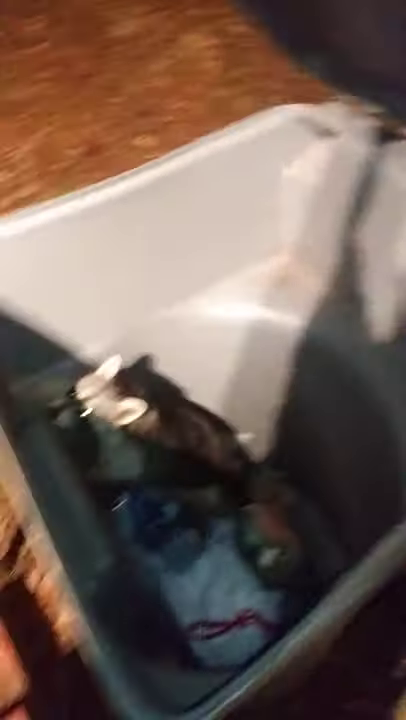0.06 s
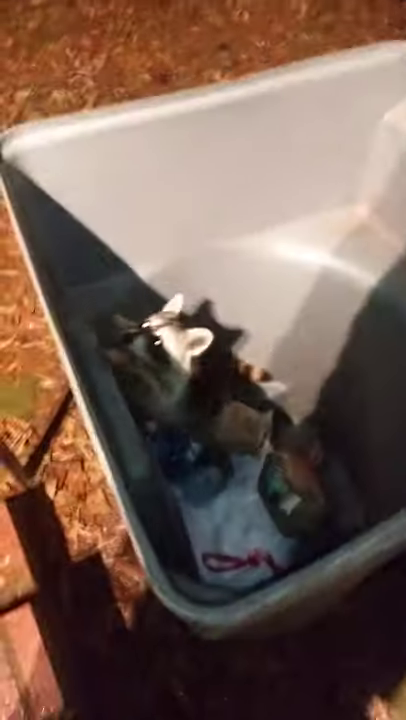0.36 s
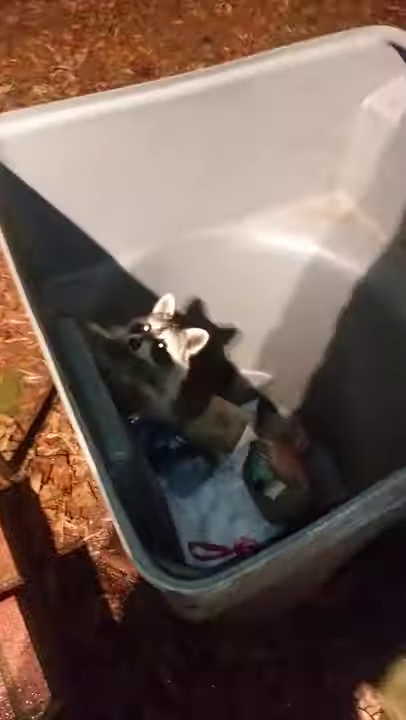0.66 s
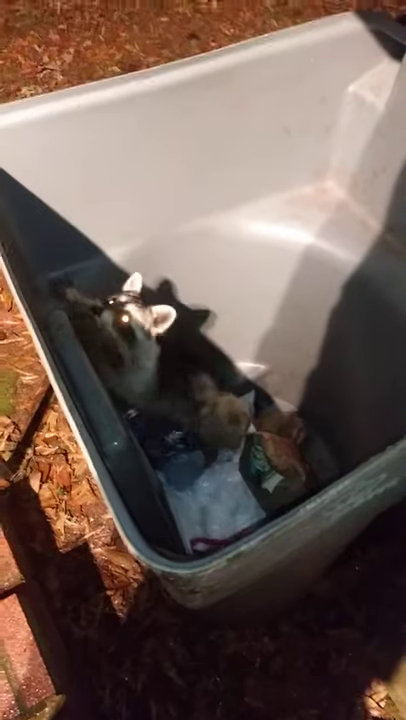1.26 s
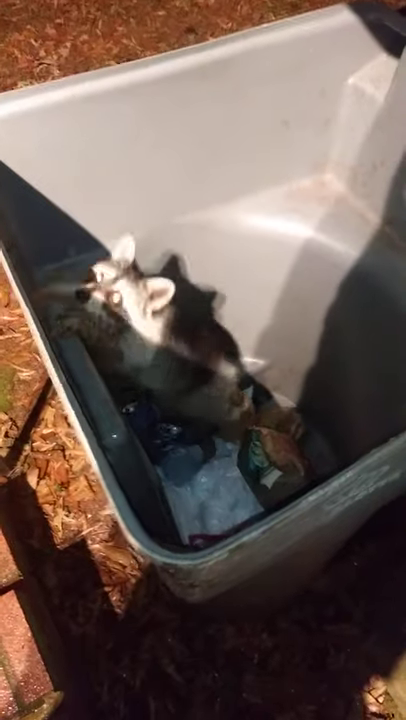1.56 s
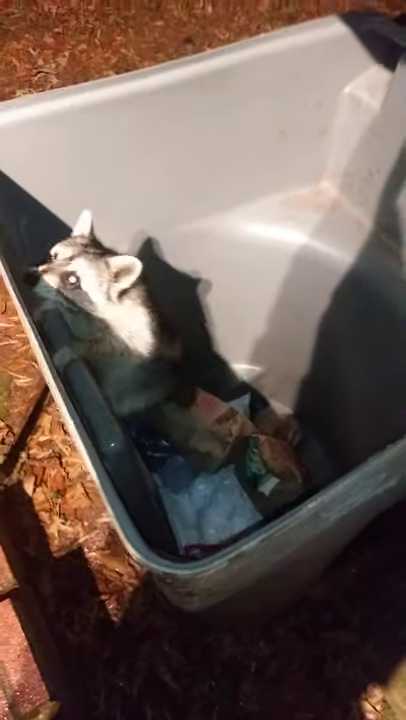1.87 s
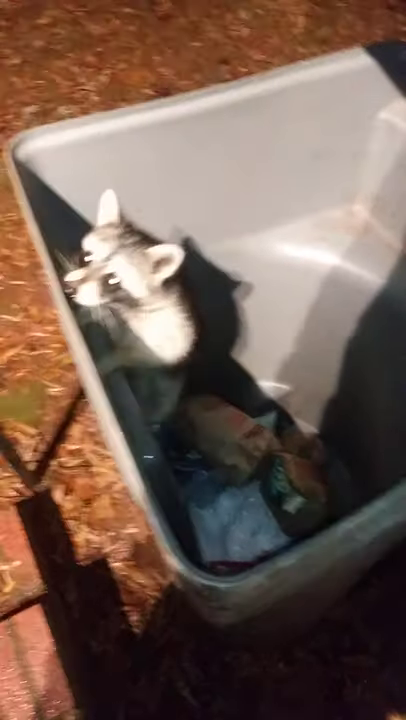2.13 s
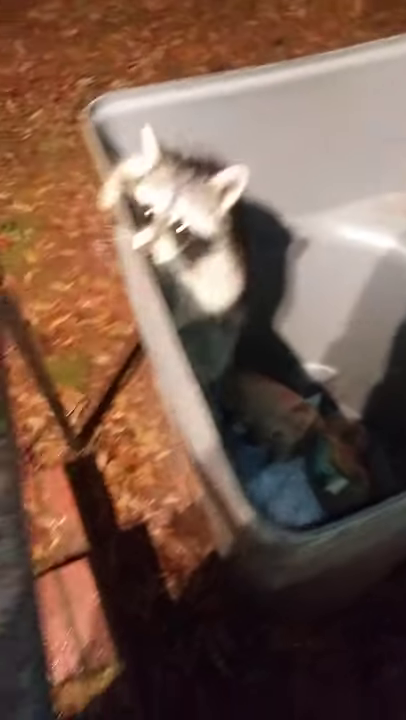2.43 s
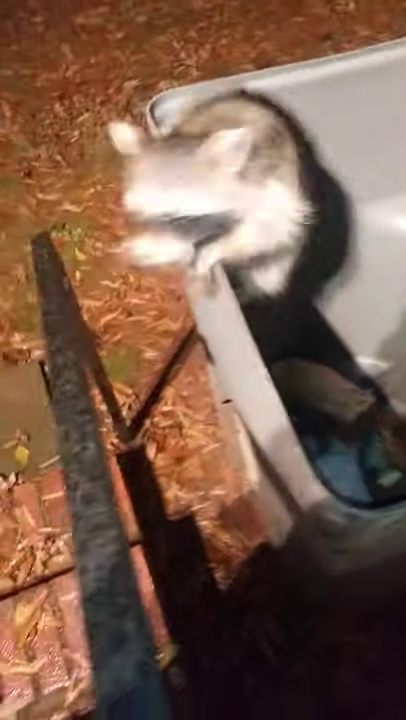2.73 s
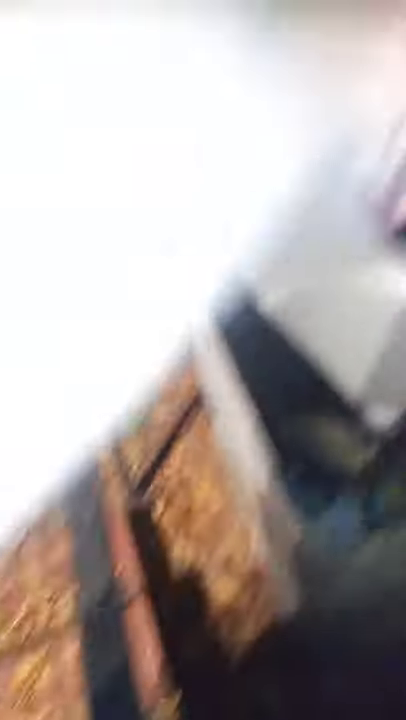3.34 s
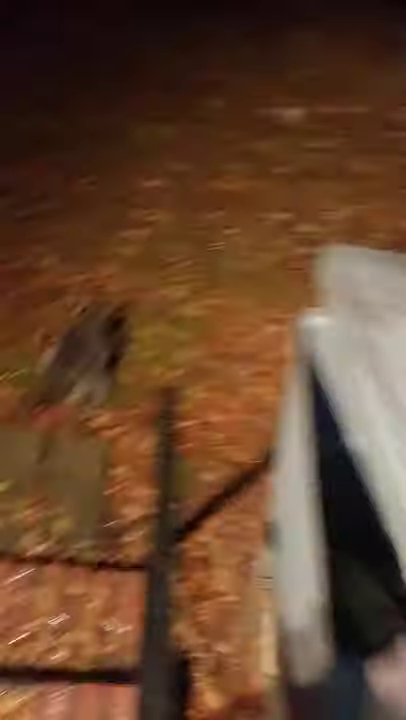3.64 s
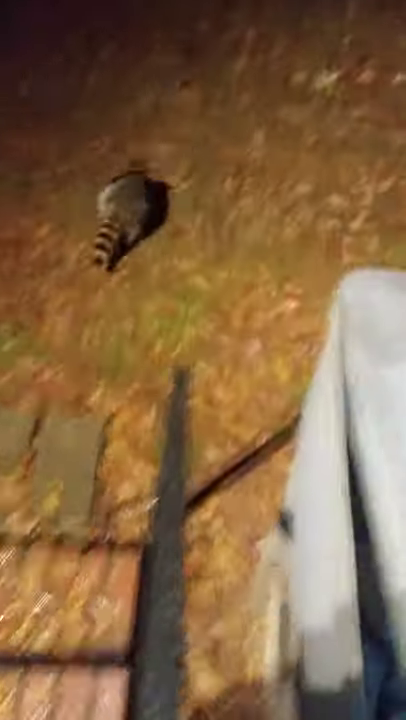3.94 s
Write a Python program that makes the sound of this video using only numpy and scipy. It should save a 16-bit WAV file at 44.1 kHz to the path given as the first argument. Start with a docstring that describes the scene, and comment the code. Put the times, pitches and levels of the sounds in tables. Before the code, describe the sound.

Scrabbling, rustling and hollow knocks as a raccoon claws its way out of a plastic bin.

```python
"""In a yard at night, a raccoon scrabbles inside a plastic wheelie bin. Litter crinkles under it in
thousands of tiny snaps, its paws thump the hollow walls and make them ring, its claws catch and
scratch, and its pads stick and squeak. It pauses, hauls itself over the rim with a knock and drops
into dry leaves; a quick clatter of hard plastic taps and more knocks follow. The yard gives a faint
echo, and a quiet outdoor hiss with a thin, high whine lies under it all."""
import sys
import numpy as np
from scipy import signal
from scipy.fft import rfft, irfft, next_fast_len
from scipy.io import wavfile
from scipy.ndimage import map_coordinates

SR = 44100
rng = np.random.default_rng(int(sys.argv[2]) if len(sys.argv) > 2 else 0)


def unload_audio(sound):
    """Save the sound as a 16-bit wav file, at the path given as the first command line argument."""
    columns = np.transpose(np.atleast_2d(sound))
    # keep every value between -1 and 1, then stretch to whole-number steps
    steps = np.round(np.clip(columns, -1, 1) * 32767)
    wavfile.write(sys.argv[1], SR, steps.astype(np.int16))


N = 176400  # 4 seconds

# Trampled litter and the walls it rubs: (time [s], crinkle level [dB], wall level [dB])
LITTER_LEVELS = [(0, -27.5, -38.5), (.09, -34.5, -35.5), (.15, -44.5, -42.5), (.19, -28, -30),
                 (.225, -31.5, -39.5), (.28, -28, -39), (.31, -34, -38), (.35, -29, -41), (.39, -40, -41.5),
                 (.47, -41, -45), (.545, -41, -41), (.6, -41.5, -51), (.64, -48, -46.5), (.7, -41, -48.5),
                 (.745, -42, -42.5), (.77, -44, -39), (.825, -33, -36), (.85, -40, -34), (.9, -31, -46),
                 (.955, -29.5, -35), (.975, -38, -39), (1, -29, -47), (1.03, -32.5, -41.5),
                 (1.06, -45, -42), (1.15, -40, -49), (1.19, -39.5, -37.5), (1.215, -39, -38.5),
                 (1.3, -45, -46), (1.355, -33, -37.5), (1.39, -35, -35.5), (1.44, -46, -48.5),
                 (1.5, -42, -45), (1.555, -40.5, -38), (1.58, -32.5, -34), (1.61, -40.5, -40),
                 (1.645, -26, -37), (1.685, -36, -55), (1.705, -30.5, -40), (1.76, -39, -40),
                 (1.79, -38.5, -42), (1.85, -41.5, -44), (1.9, -49, -48), (1.96, -53.5, -64),
                 (2.1, -86.5, -98)]
# Tone of the litter: (frequency [Hz], level [dB])
LITTER_TONE = [(100, -84), (300, -3.5), (600, -6.5), (1100, 0.5), (1500, -2.5), (2300, 0.5), (3700, 1.5),
               (4500, 0), (5600, -12), (6600, -16), (8000, -22.5), (9800, -15), (13000, -16), (16000, -20)]
# Tone laid over the ring of the rubbed walls: (frequency [Hz], level [dB])
WALL_TONE = [(60, -29), (130, -1.5), (300, 1.5), (650, 3), (1100, 17), (2000, 3), (6000, -28)]
# Single sharp snaps of litter: (time [s], level [dB])
LITTER_SNAPS = [(0.221, -33.5), (.2428, -37), (0.3289, -35.5), (0.356, -35.5), (0.9932, -39.5),
                (1.6962, -36.5)]
# Notes the bin rings at: (frequency [Hz], level [dB], fade time [s])
# A fade time, or t60, is how long a sound takes to drop by 60 dB.
BIN_NOTES = [(117.5, -25, 0.61), (176, -12, 0.36), (216, -2, 0.17), (252.8, 0.5, 0.19), (277.3, -3, 0.19),
             (313.9, 0.5, 0.14), (337.3, -10, 0.16), (398.5, -5, 0.2), (421, -3, 0.15), (460, -4.5, 0.16),
             (536, -3, 0.094), (588, 0, 0.078), (617, -1, 0.13), (663, -5, 0.094)]
# Blows on the bin: (time [s], ring level [dB], pitch the struck spot favours [Hz], its boost [dB],
# clack level [dB], top of the clack [Hz], ring length [factor])
BIN_BLOWS = [(0.1584, -17.5, 385, 9, -23, 1050, 0.85), (0.825, -31, 495, -3, -35, 2400, 0.61),
             (0.852, -31, 595, 7, -34.5, 2000, 0.45), (0.886, -31, 240, 0, -38, 1500, 0.82),
             (1.0694, -26, 390, -0.5, -29, 1000, 0.87), (1.4, -29.5, 660, 8.5, -30.5, 1100, 0.3),
             (1.579, -23, 233, 4.5, -37, 890, 1.06), (1.656, -26.5, 600, 6, -52, 1500, 0.75),
             (1.745, -32.5, 252, 9.5, -60, 1000, 1.3), (2.917, -55, 324, 32, -26.5, 1800, .6),
             (2.922, -26, 302, 19.5, -42, 1600, 0.79), (3.057, -37.5, 306, 8.5, -47.5, 900, 0.53),
             (3.444, -34, 340, 7, -43.5, 1270, 0.87), (3.556, -40, 300, 11, -51, 1600, 0.54),
             (3.6, -41, 380, 8, -47, 1600, 0.32), (3.858, -30, 620, 33, -31, 2180, 0.64),
             (3.863, -23, 381, 21.5, -36, 1210, 0.96), (3.943, -36, 500, 12, -49.5, 1210, 0.84),
             (3.981, -36, 454, 10, -45, 1200, 1.5)]
# Tone of a blow's clack: (frequency [Hz], level [dB])
CLACK_TONE = [(50, -36), (150, -42), (400, -1.5), (750, 3.5), (1100, 2), (1600, 0.5), (4000, -4)]
# Claw strokes: (time [s], level [dB], centre [Hz], treble level [dB], rise time [s], fade time [s])
CLAW_STROKES = [(0.113, -35.5, 4200, -39.5, 0.002, 0.089), (0.412, -38, 3600, -51, 0.001, 0.041),
                (.442, -36, 3750, -50, 0.0011, 0.027), (0.514, -43, 4500, -39, 0.0003, 0.055),
                (.532, -36.5, 1430, -56, 0.012, 0.082), (0.726, -40, 3540, -49.5, 0.0018, 0.032),
                (.76, -31, 1770, -66, 0.011, 0.21), (.824, -29.5, 2140, -64, .007, 0.05),
                (0.851, -32.5, 2210, -41.5, 0.00051, 0.053), (1.231, -30, 4170, -41, 0.0027, 0.027),
                (1.399, -27.5, 3240, -48.5, 0.002, 0.035), (1.573, -35, 3820, -41.5, 0.0026, 0.041),
                (1.62, -34, 4030, -40.5, 0.0018, 0.068), (1.659, -33.5, 3800, -45, 0.0009, 0.03),
                (1.809, -32.5, 4300, -40, 0.0026, 0.078), (1.873, -35.5, 4180, -44.5, 0.0014, 0.035),
                (1.91, -41.5, 3640, -44.5, 0.00067, 0.058), (2.25, -44, 3060, -56.5, 0.00067, 0.045),
                (2.487, -52.5, 2250, -71, 0.0005, 0.12), (2.781, -42.5, 3920, -54.5, 0.0023, 0.09),
                (2.846, -43.5, 2780, -54.5, 0.0015, 0.074), (2.914, -36, 1700, -60, 0.0011, 0.14),
                (2.945, -45, 4400, -60, 0.014, 0.22), (3.643, -43.5, 2500, -52, 0.0006, 0.074),
                (3.749, -60, 3980, -51, 0.003, 0.06), (3.857, -35.5, 2800, -53.5, 0.00041, 0.074)]
# Tone of the body of a scratch: (frequency [Hz], level [dB])
CLAW_TONE = [(100, -59), (400, -4), (1000, 4.5), (2200, 3), (3700, 4), (4700, 1), (5700, -8), (6700, -14),
             (8200, -40)]
# Tone of its bright edge: (frequency [Hz], level [dB])
CLAW_TREBLE_TONE = [(4000, -10), (8000, -5.5), (9800, 2), (12500, 2), (16000, -0.5)]
# Small ringing notes of the plastic under a claw: (frequency [Hz])
PLASTIC_NOTES = [1710, 2560, 3500, 4300]
# A quick clatter of hard plastic taps: (time [s], level [dB])
CLATTER_TAPS = [(3.549, -34.5), (3.5538, -35), (3.56, -37), (3.57, -36.5), (3.58, -39.5), (3.586, -52),
                (3.602, -32.5), (3.607, -54)]
# Notes of the clattering plastic: (frequency [Hz], width [Hz], level [dB])
CLATTER_NOTES = [(1350, 400, -6), (2500, 330, -5), (3330, 240, 1), (3820, 320, 0.5), (4620, 380, 0),
                 (9560, 600, -11.5), (10530, 490, -10.5), (13500, 2500, -20)]
# Paw pads squeaking on the plastic: (time of the peak [s], level [dB], pitch [Hz])
PAD_SQUEAKS = [(.54, -39, 1075), (1.755, -40.5, 756), (2.668, -44, 614)]
# Paws and fur sliding over the rim, then the run through leaves: (time [s], level [dB])
SLIDE_LEVELS = [(2.2, -60), (2.37, -59), (2.4, -55.5), (2.46, -59.5), (2.5, -51), (2.6, -55.5),
                (2.665, -41.5), (2.725, -48), (2.75, -60.5), (2.87, -47.5), (2.95, -57), (3.01, -58),
                (3.04, -50.5), (3.1, -53.5), (3.13, -47), (3.19, -40.5), (3.23, -51.5), (3.35, -55.5),
                (3.42, -54.5), (3.52, -54), (3.58, -56), (3.72, -55.5), (3.82, -58.5), (3.9, -47.5),
                (4, -49)]
# Tone of that sliding: (frequency [Hz], level [dB])
SLIDE_TONE = [(80, -41), (180, 2), (320, 9), (600, 3), (1100, 4.5), (2100, 0.5), (3500, -2.5), (4700, -5.5),
              (5800, -15.5), (8000, -20), (10000, -15)]
# A soft brushing as the animal leaves the rim: (time [s], level [dB])
BRUSH_LEVELS = [(3.1, -77), (3.22, -57.5), (3.36, -59), (3.5, -54.5), (3.6, -99)]
# Tone of the outdoor hiss: (frequency [Hz], level [dB])
AIR_TONE = [(60, -19), (120, -7), (250, 4.5), (600, 1), (1300, 2.5), (2200, -4), (4300, -5.5), (5800, -12),
            (8000, -22), (10000, -11.5), (14000, -17)]

CRINKLES_PER_S, CRINKLE_SPREAD_DB, CLUMP_DB = 6000, 2.5, 1
FIZZ_HZ, FIZZ_FLICKER_DB, FIZZ_LINGER, FIZZ_PIVOT_DB = 5800, -1.5, 0.085, -33
HOLLOW_T60_S, HOLLOW_DB = 0.025, -3.5
SPOT_OCTAVES, NOTE_SCATTER_DB, PHASE_SCATTER_CYCLES = 0.42, 2, 0.4
SHARP_FRACTION, PITCH_SINK_S = 0.063, 0.015
PAD_RISE_S, HARD_RISE_S = 0.0042, 0.00041
BASS_CUT_HZ = 203  # takes the deep bass out of the thumps and taps
CLAW_GRAINS_PER_S, CLAW_SPREAD_DB, CLAW_RING_DB, PLASTIC_DB = 8000, 1.5, 7, 3.5
CLATTER_TAIL_DB, SQUEAK_SWELL_S = -22.5, 0.014
YARD_T60_S, YARD_DB = 0.3, -14.5
AIR_DB, WHINE_HZ, WHINE_DB, TOP_HZ = -62.5, 14002, -82, 16000


def litter():
    """Paper and plastic crinkle underfoot and rub the walls into a hollow murmur."""
    level_db, walls_db = curves(LITTER_LEVELS)
    rustle = with_tone(crinkle(), LITTER_TONE)
    # The high fizz flickers, and drops less than the rest between strokes.
    fizz = filtered(rustle, lambda f: f > FIZZ_HZ)
    fizz_db = FIZZ_FLICKER_DB * wobble(per_s=24.7) + FIZZ_LINGER * (FIZZ_PIVOT_DB - level_db)
    rustle = rustle + fizz * (amp(fizz_db) - 1)
    # The longer a note rings, the narrower its peak.
    notes = [(hz, 2 * np.log(1000) / (np.pi * t60), db) for hz, db, t60 in BIN_NOTES]
    walls = with_tone(filtered(crinkle(), lambda f: ringing(f, notes)), WALL_TONE)
    return amp(level_db) * rustle + amp(walls_db) * walls


def crinkle(chunk=512):
    """Clumps of tiny snaps, each chunk smeared differently by the hollow of the bin."""
    clicks = grains(N, CRINKLES_PER_S, CRINKLE_SPREAD_DB) * amp(CLUMP_DB * wobble(per_s=70))
    track = clicks.copy()
    for i in range(0, N, chunk):
        tail = echo_tail(4 * chunk, HOLLOW_T60_S)
        add(track, i / SR, amp(HOLLOW_DB) * signal.fftconvolve(clicks[i:i + chunk], tail))
    return track


def snaps():
    """A crease in the litter gives way with one short crack."""
    track, t = np.zeros(N), np.arange(SR // 10) / SR
    for start, db in LITTER_SNAPS:
        crack = rng.standard_normal(len(t)) * fade(t, t60=0.031)
        crack = np.pad(crack, (len(t), 0))  # room for the filter to spread the crack
        add(track, start - len(t) / SR, amp(db) * burst(with_tone(crack, LITTER_TONE)))
    return track


def thumps():
    """Each blow clacks and rings the bin's low notes; the spot struck changes their balance."""
    track, t = np.zeros(N), np.arange(SR // 3) / SR
    hz, db, t60 = np.transpose(BIN_NOTES)[:, :, None]
    bass_cut = signal.butter(2, BASS_CUT_HZ, "high", fs=SR, output="sos")
    # A dented wall starts a little sharp and sinks to its own pitch.
    cycles = hz * (t + SHARP_FRACTION * PITCH_SINK_S * rise(t, PITCH_SINK_S))
    for start, ring_db, spot_hz, spot_db, clack_db, top_hz, length in BIN_BLOWS:
        note_db = db + spot_db * bell(hz, spot_hz, SPOT_OCTAVES)
        note_db += NOTE_SCATTER_DB * rng.standard_normal(hz.shape)
        phase = 2 * np.pi * (cycles + PHASE_SCATTER_CYCLES * rng.random(hz.shape))
        notes = amp(note_db) * fade(t, t60 * length) * np.sin(phase)
        ring = signal.sosfilt(bass_cut, rise(t, PAD_RISE_S) * notes.sum(0))
        clack = with_tone(rng.standard_normal(len(t)), CLACK_TONE) * fade(t, t60=0.097)
        clack = filtered(clack, lambda f: 1 / np.sqrt(1 + (f / top_hz) ** 10))
        clack = signal.sosfilt(bass_cut, rise(t, HARD_RISE_S) * clack)
        add(track, start, amp(ring_db) * burst(ring) + amp(clack_db) * burst(clack))
    return track


def scratches():
    """A claw catches and slips: a quick, dying spray of clicks, coloured by what it catches on."""
    track, t = np.zeros(N), np.arange(SR // 5) / SR
    plastic_db = lambda f: PLASTIC_DB * sum(bell(f, hz, octaves=0.034) for hz in PLASTIC_NOTES)
    for start, db, centre_hz, treble_db, rise_s, t60 in CLAW_STROKES:
        shape = rise(t, rise_s) * fade(t, t60)
        grit = grains(len(t), CLAW_GRAINS_PER_S, CLAW_SPREAD_DB)
        boost = lambda f: amp(CLAW_RING_DB * bell(f, centre_hz, octaves=0.63) + plastic_db(f))
        body = filtered(with_tone(grit, CLAW_TONE), boost)
        treble = with_tone(grit, CLAW_TREBLE_TONE)
        add(track, start, amp(db) * burst(shape * body) + amp(treble_db) * burst(shape * treble))
    return track


def clatter():
    """Quick hard taps each ring the same notes of the plastic and leave a faint tail."""
    track, t = np.zeros(N), np.arange(SR // 5) / SR
    tail = amp(CLATTER_TAIL_DB) * fade(t, t60=0.45)
    shape = rise(t, HARD_RISE_S) * (fade(t, t60=0.025) + tail)
    plastic = lambda f: ringing(f, CLATTER_NOTES) * f / np.hypot(f, BASS_CUT_HZ)
    for start, db in CLATTER_TAPS:
        tap = filtered(rng.standard_normal(len(t)), plastic)
        add(track, start, amp(db) * burst(shape * tap))
    return track


def squeaks():
    """A pad sticks and slips for a moment, swelling one narrow note of the wall."""
    track, t = np.zeros(N), np.arange(SR // 5) / SR
    swell = np.exp(-((t - t.mean()) / SQUEAK_SWELL_S) ** 2)
    for peak_time, db, hz in PAD_SQUEAKS:
        ring = noise_band(len(t), hz, octaves=0.082)
        add(track, peak_time - t.mean(), amp(db) * burst(swell * ring))
    return track


def slide():
    """Softer, duller rubbing as the animal climbs out and runs off, with a brushing as it drops."""
    level_db, = curves(SLIDE_LEVELS)
    brush_db, = curves(BRUSH_LEVELS)
    brush = unit(noise_band(N, centre_hz=1960, octaves=0.4))
    return amp(level_db) * with_tone(crinkle(), SLIDE_TONE) + amp(brush_db) * brush


def yard_echo(x):
    """The yard sends back many faint reflections that die away."""
    return amp(YARD_DB) * signal.fftconvolve(x, echo_tail(SR // 2, YARD_T60_S))[:len(x)]


def night_air():
    """A steady outdoor hiss with a thin, high whine in it."""
    hiss = with_tone(rng.standard_normal(N), AIR_TONE)
    whine = unit(np.sin(2 * np.pi * WHINE_HZ * np.arange(N) / SR))
    return amp(AIR_DB) * hiss + amp(WHINE_DB) * whine


def amp(db):
    """Turn decibels into a multiplier."""
    return 10 ** (np.asarray(db) / 20)


def unit(x):
    """Scale x to an average strength (rms) of 1."""
    return x / np.sqrt(np.mean(x ** 2) + 1e-20)


def burst(x):
    """Scale a short sound to the energy of 20 ms at strength 1."""
    return x / np.sqrt(np.sum(x ** 2) / (SR * .02) + 1e-20)


def rise(t, seconds):
    """Climb from 0 towards 1."""
    return 1 - np.exp(-t / seconds)


def fade(t, t60):
    """Drop by 60 dB every t60 seconds."""
    return amp(-60 * t / t60)


def add(track, start, x):
    """Mix x into the track at start seconds."""
    part = track[max(0, round(start * SR)):][:len(x)]
    part += x[:len(part)]


def curves(rows):
    """Join the rows with straight lines: one curve for each column after the time."""
    times, *columns = np.transpose(rows)
    return [np.interp(np.arange(N) / SR, times, column) for column in columns]


def wobble(per_s):
    """A smooth curve through per_s random points a second."""
    points = rng.standard_normal(int(N * per_s / SR) + 4)
    return map_coordinates(points, [np.arange(N) * per_s / SR])


def grains(size, per_s, spread_db):
    """Tiny random clicks, most weak and a few strong."""
    strength = amp(spread_db * np.minimum(rng.exponential(size=size), 5))
    return (rng.random(size) < per_s / SR) * strength * rng.choice([-1, 1], size)


def echo_tail(size, t60):
    """Fading noise that stands for many reflections."""
    tail = rng.standard_normal(size) * fade(np.arange(size) / SR, t60)
    return tail / np.linalg.norm(tail)


def bell(hz, centre_hz, octaves):
    """A hump from 0 to 1 around a centre frequency."""
    return np.exp(-(np.log2((hz + 1) / centre_hz) / octaves) ** 2)


def ringing(f, notes):
    """How strongly a set of ringing notes answers at frequency f."""
    return np.sqrt(sum(amp(2 * db) / (1 + (2 * (f - hz) / width) ** 2) for hz, width, db in notes))


def noise_band(size, centre_hz, octaves):
    """Noise kept close to one pitch."""
    return filtered(rng.standard_normal(size), lambda f: bell(f, centre_hz, octaves))


def filtered(x, gain):
    """Multiply each frequency f in x by gain(f)."""
    size = next_fast_len(len(x) + 8192)
    return irfft(rfft(x, size) * gain(np.fft.rfftfreq(size, 1 / SR)), size)[:len(x)]


def with_tone(x, tone):
    """Shape x with a tone table, then scale it to strength 1."""
    hz, db = np.transpose(tone)
    return unit(filtered(x, lambda f: amp(np.interp(np.log(f + 1), np.log(hz), db))))


def scene():
    """The raccoon and the bin, their echo in the yard, and the night air."""
    near = litter() + snaps() + slide() + thumps() + scratches() + squeaks() + clatter()
    return (near + yard_echo(near) + night_air())[None]


def record(dry):
    """Keep only the sound below TOP_HZ."""
    return filtered(dry[0], lambda f: f < TOP_HZ)[None]


dry = scene()
out = record(dry)
unload_audio(out)
```